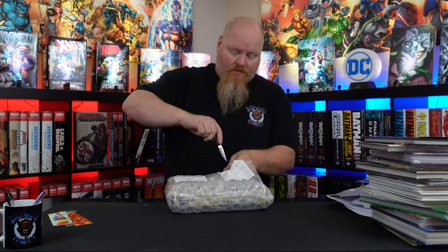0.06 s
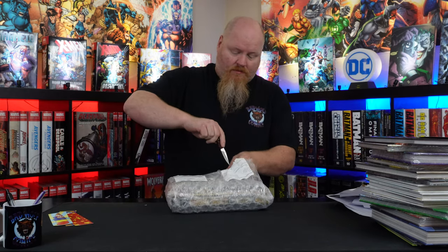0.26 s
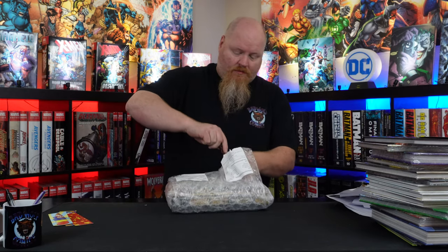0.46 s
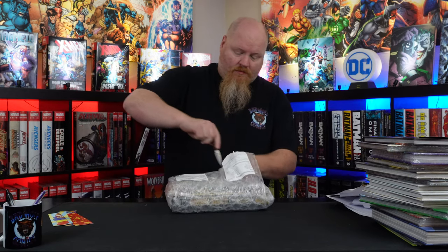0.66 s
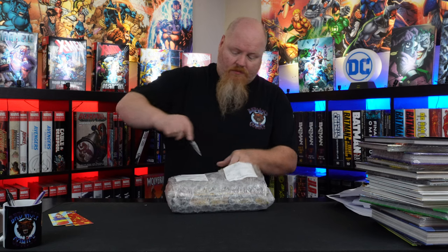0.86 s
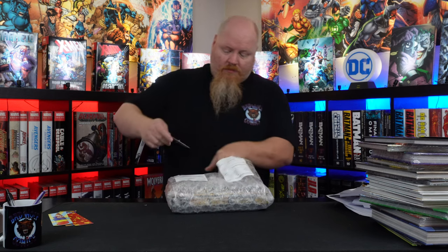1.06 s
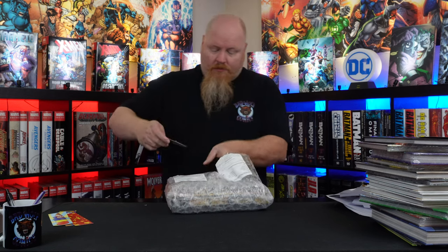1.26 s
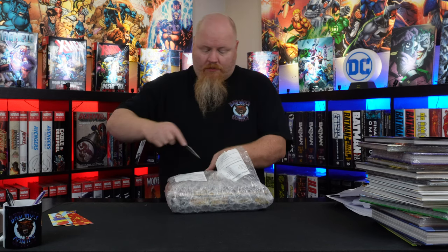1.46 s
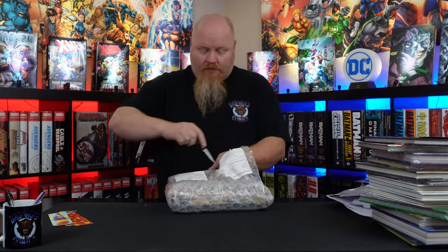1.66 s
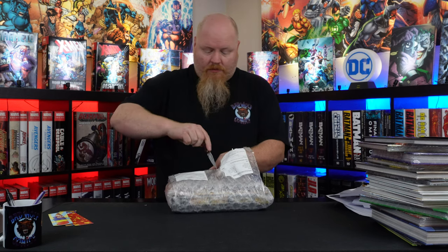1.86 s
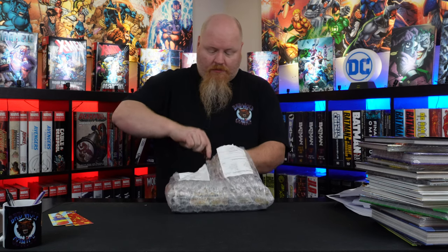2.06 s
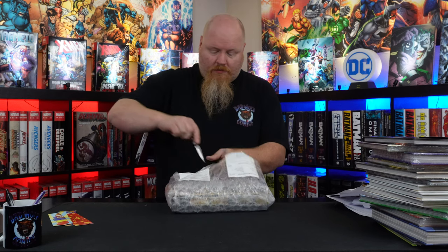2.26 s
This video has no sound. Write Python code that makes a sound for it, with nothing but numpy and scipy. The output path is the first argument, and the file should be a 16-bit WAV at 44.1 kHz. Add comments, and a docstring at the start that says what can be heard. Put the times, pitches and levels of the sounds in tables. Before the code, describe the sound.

Plastic bubble wrap being cut open, rustling and crackling, as two bubbles burst.

```python
"""A knife rips a plastic bubble mailer open in a run of sharp snaps, on a desk in a small furnished room.
Each break is an impulse that rings the taut film, the air pocket behind it and the cut edge; stick-slip
of the blade makes short zips. Under the hand the film rustles, ticks and sizzles, and the bag bumps.
Two bubbles burst: the sudden release of air gives loud pops that ring in the bag and the room."""
import sys
import numpy as np
from scipy import signal
from scipy.fft import rfft, irfft
from scipy.io import wavfile
from scipy.ndimage import uniform_filter1d, minimum_filter1d

SR = 44100
rng = np.random.default_rng(int(sys.argv[2]) if len(sys.argv) > 2 else 0)


def transcribe(u):
    """Save the signal u as a 16-bit wav file named by the first command-line argument.

    u: samples, shape (n,) or (channels, n), limited to [-1, 1]; the rate is SR.
    q: integer samples, one column per channel.
    """
    v = np.clip(np.atleast_2d(u).T, -1, 1)
    q = np.round(v * 32767).astype(np.int16)
    wavfile.write(sys.argv[1], SR, q)


N = 101429
HZ = np.fft.rfftfreq(4096, 1 / SR) + 1


def amp(db):
    """Amplitude ratio of a level in decibels."""
    return 10 ** (np.asarray(db) / 20)


def curve(points, hz=HZ):
    """Interpolation of a table on a logarithmic frequency axis."""
    f, value = np.transpose(points)
    return np.interp(np.log(hz + 1), np.log(f), value)


def unit(x):
    """Normalisation to unit energy."""
    return x / np.sqrt(np.sum(x ** 2) + 1e-20)


def add(mix, s, sound):
    """Superposition: a sound joins the mix at s seconds."""
    part = mix[max(round(s * SR), 0):][:len(sound)]
    part += sound[:len(part)]


def minimum_phase(gain):
    """Minimum phase gives the most compact causal pulse with a given magnitude spectrum."""
    log_gain = np.log(np.maximum(np.r_[gain, gain[-2:0:-1]], 1e-5 * gain.max()))
    return np.fft.ifft(np.exp(np.conj(signal.hilbert(log_gain)))).real


def click(spectrum):
    """Impulse response of a tabulated spectrum, at unit energy."""
    return unit(minimum_phase(amp(curve(spectrum))))


def noise_burst(spectrum, decay_s):
    """Damped random vibration: filtered noise under an exponential decay, at unit energy."""
    t = np.arange(SR // 8) / SR
    return unit(signal.fftconvolve(rng.standard_normal(len(t)) * np.exp(-t / decay_s), click(spectrum)))


# envelope of the film sliding under the hand: t/s, level/dB
RUSTLE_ENVELOPE = [(0, -43), (.13, -45.5), (.19, -56), (.24, -42), (.31, -46), (.37, -54.5), (.52, -48.5),
                   (.58, -59.5), (.63, -58), (.72, -50), (.83, -52), (.86, -44), (.915, -46.5),
                   (0.982, -42), (0.994, -60), (1.05, -50), (1.11, -46), (1.15, -41.5), (1.2, -45.5),
                   (1.28, -43.5), (1.42, -37.5), (1.52, -42), (1.6, -49), (1.721, -56), (1.871, -60),
                   (1.99, -50), (2.1, -55), (2.18, -68), (2.24, -56), (2.27, -47), (2.3, -52)]
# spectrum of the sliding film: f/Hz, level/dB
RUSTLE_SPECTRUM = [(60, -33), (200, -10), (500, -4), (1050, 0.5), (1600, -3), (2600, -1.5), (3400, 2.5),
                   (4500, -2), (6500, -9.5), (9000, -17.5), (15000, -29)]
def rustle(grains_per_s=800, colours=12, spread_db=5, tilt_db_per_octave=0.55, hiss_share=0.62):
    """Friction noise: a Poisson stream of tiny, brighter crinkles over the hiss of sliding film."""
    grains = np.zeros(N)
    for _ in range(colours):
        size = amp(spread_db * np.minimum(rng.exponential(1, N), 3.3)) * rng.choice([-1, 1], N)
        train = size * (rng.random(N) < grains_per_s / colours / SR)
        spectrum = [(hz, db + tilt_db_per_octave * np.log2(hz / CREASE_HZ) + 4 * rng.standard_normal())
                    for hz, db in RUSTLE_SPECTRUM]
        grains += signal.oaconvolve(train, click(spectrum))[:N]
    hiss = signal.oaconvolve(rng.standard_normal(N), click(RUSTLE_SPECTRUM))[:N]
    envelope = amp(np.interp(np.arange(N) / SR, *np.transpose(RUSTLE_ENVELOPE)))
    return unit(unit(grains) + hiss_share * unit(hiss)) * np.sqrt(N) * envelope


# spectrum of still room air: f/Hz, level/dB
ROOM_AIR_SPECTRUM = [(20, -2.5), (60, 6), (110, -3.5), (300, -0.5), (4000, -8), (15000, -21.5)]
def room_air(level_db=-64):
    """Stationary noise: the faint, steady air of the room."""
    return amp(level_db) * signal.oaconvolve(rng.standard_normal(N), click(ROOM_AIR_SPECTRUM))[:N]


RING_Q, POCKET_HZ, POCKET_Q, EDGE_HZ, EDGE_Q = 2.13, 931, 1.45, 6520, 3
TEAR_S, TEAR_SHARE = 0.0016, 0.56  # the ragged part of a break
DESK_S, DESK_SHARE = 0.00057, 0.49  # reflection from the desk top
def snap(ring_db, ring_hz, pocket_db, edge_db, skirt=1.63, pocket_delay_s=0.000694):
    """Impulse excitation: a ragged break drives the resonances of film, air pocket and cut edge."""
    resonances = (ring_db, ring_hz, RING_Q), (pocket_db, POCKET_HZ, POCKET_Q), (edge_db, EDGE_HZ, EDGE_Q)
    power = 0
    for db, hz, q in resonances:
        shape = (1 + (q * (HZ / hz - hz / HZ)) ** 2) ** -skirt
        power = power + amp(db) ** 2 * shape / shape.mean()
    power = power / (1 + (267.3 / HZ) ** 4) / (1 + (HZ / 15000) ** 8)  # band that a small patch radiates
    # dispersion: low frequencies leave the film later
    lag = np.exp(-4j * np.pi * pocket_delay_s * POCKET_HZ * np.arctan(HZ / POCKET_HZ))
    response = irfft(rfft(minimum_phase(np.sqrt(power))) * lag)[:SR // 40]
    t = np.arange(SR // 200) / SR
    excitation = TEAR_SHARE * unit(rng.standard_normal(len(t)) * np.exp(-t / TEAR_S))
    excitation[0] += 1
    add(excitation, DESK_S * rng.uniform(0.85, 1.15), np.array([DESK_SHARE]))
    return np.convolve(response, unit(excitation))


# spectrum of fine fibres parting: f/Hz, level/dB
FIZZ_SPECTRUM = [(3000, -54), (6000, 12), (9500, -2), (15000, -16.5)]
def fizz(db, decay_s):
    """Small-scale fracture: fine fibres part in a spit of high-frequency noise."""
    return amp(db) * noise_burst(FIZZ_SPECTRUM, decay_s)


# small creases flipping: t/s, level/dB
CREASE_FLIPS = [(0.038, -17), (0.0512, -15), (0.201, -17), (0.5367, -24), (0.5484, -22), (0.582, -25.5),
                (0.604, -28), (0.738, -24), (.8136, -25), (0.85, -12), (0.8822, -22), (0.9376, -17),
                (1.0312, -23.5), (1.058, -18.5), (1.0814, -10.5), (1.098, -20), (1.1333, -16),
                (1.1678, -17), (1.2165, -16.5), (1.239, -20), (1.418, -7), (1.469, -10), (1.514, -23),
                (1.6238, -20), (1.6636, -17.5), (1.8936, -25.5), (1.9655, -20), (2.1224, -23),
                (2.2505, -22)]
CREASE_HZ, EDGE_RE_RING_DB = 3495, -17
def creases():
    """Buckling: each crease flips with a tick of slightly different pitch."""
    out = np.zeros(N)
    for (s, db), detune in zip(CREASE_FLIPS, rng.standard_normal(len(CREASE_FLIPS))):
        ring_hz = CREASE_HZ * np.exp(0.1 * detune)
        add(out, s, snap(db, ring_hz, pocket_db=db - 9, edge_db=db + EDGE_RE_RING_DB))
        add(out, s, fizz(db - 16.5, TEAR_S))
    return out


# the padded bag shifting on the desk: t/s, level/dB, decay time/s
BAG_BUMPS = [(0.131, -13.5, 0.0044), (.53, -18, 0.032), (0.94, -22, 0.018), (0.974, -17.5, 0.0052),
             (1.6604, -22, 0.0046), (1.9635, -17.5, 0.0036), (2.1943, -20.5, 0.0048)]
# spectrum of a bump: f/Hz, level/dB
BUMP_SPECTRUM = [(60, -31), (130, -12.5), (250, -4.5), (500, 1.5), (900, -1.5), (2000, -16.5), (8000, -33)]
def bumps():
    """Damped impact: the padded bag gives soft, hollow knocks."""
    out = np.zeros(N)
    for s, db, decay_s in BAG_BUMPS:
        add(out, s, amp(db) * noise_burst(BUMP_SPECTRUM, decay_s))
    return out


# film giving way at the blade: t/s, ring level/dB, ring f/Hz, air-pocket level/dB, edge level/dB
FILM_BREAKS = [(0.2189, -6.5, 2110, -32, -27), (0.2197, 2, 3500, -15.5, -39),
               (0.3355, -7, 2980, -13.5, -27), (.3946, 8, 3250, -28, -3), (0.5664, -16, 2370, -17.5, -47),
               (1.3097, 1.5, 3830, -13, -28), (1.3343, 4, 4060, -4.5, -19), (1.3556, 1.5, 4100, -9, -6),
               (1.3762, 5.5, 3750, -0.5, -5), (1.4, 3.5, 3470, 0.5, -16), (1.434, 9.5, 3700, 8.5, -3),
               (1.443, 6, 3250, 0, -9), (1.458, 5.5, 3750, -2.5, -22), (1.5367, -5, 3740, -0.5, -7),
               (1.5495, 3, 3050, 4, -1.5), (1.5508, -8.5, 1730, -33, -15), (2.0071, 12.5, 3180, 0.5, -13),
               (2.1943, -11, 3100, -16, -25)]
def rips():
    """Fracture: the taut film gives way at the blade in hard snaps, each with a trace of fizz."""
    out = np.zeros(N)
    for s, ring_db, ring_hz, pocket_db, edge_db in FILM_BREAKS:
        add(out, s, snap(ring_db, ring_hz, pocket_db, edge_db))
        add(out, s + DESK_S, fizz(ring_db - 39, decay_s=0.0033))
    return out


# blade strokes: t/s, duration/s, first slip rate/Hz, last slip rate/Hz, level/dB, fade/dB, ring f/Hz
BLADE_STROKES = [(0.222, 0.043, 290, 400, -15.5, -2.5, 3680), (.27, 0.031, 430, 450, -12, -5, 3700),
                 (1.773, .036, 280, 310, -16.5, -12, 4054)]
def zips(jitter=0.13, scatter_db=2.5, lowpass_hz=7400):
    """Stick-slip friction: the sliding blade excites the film in a nearly periodic run of soft snaps."""
    out = np.zeros(N)
    for start, length, first_rate, last_rate, level_db, fade_db, hz in BLADE_STROKES:
        s = 0
        for gap, softness, detune in rng.standard_normal((24, 3)):
            if s < length:
                db = level_db + fade_db * s / length - scatter_db * softness
                ring_hz = hz * np.exp(0.06 * detune)
                add(out, start + s, snap(db, ring_hz, pocket_db=db - 30, edge_db=db + EDGE_RE_RING_DB))
                rate = first_rate + (last_rate - first_rate) * s / length
                s += np.exp(jitter * gap) / rate
    return signal.sosfilt(signal.butter(2, lowpass_hz, fs=SR, output="sos"), out)


# bursting bubbles: t/s, crack level/dB, air level/dB, air delay/s, echo delay/s, echo ratio,
# flap level/dB, flap decay time/s, bag ring level/dB, room send/dB
BURSTS = [(0.3873, 11, 13, 0.001308, 0.004016, 0.45, 12.5, 0.017, 1.5, -9),
          (2.007, -1, 9, 0.00153, .012, 0.63, 8, 0.021, 2.5, -2.5)]
# spectrum of the skin cracking: f/Hz, level/dB
CRACK_SPECTRUM = [(100, -29), (700, -8), (1500, -1), (2400, 3.5), (4800, 1.5), (7000, -3), (9000, -18.5),
                  (15000, -33)]
# spectrum of the escaping air pulse: f/Hz, level/dB
PULSE_SPECTRUM = [(70, -44.5), (110, -15.5), (190, -1.5), (290, 0), (360, -1), (760, 5.5), (1100, 5.5),
                  (1800, -15), (15000, -39)]
# spectrum of the torn skin flapping: f/Hz, level/dB
FLAP_SPECTRUM = [(80, -30), (190, -24), (360, -14), (750, -3), (1100, -1), (2400, -5.5), (3250, -1.5),
                 (5000, -7), (7000, -14.5), (9000, -18.5), (15000, -30)]
# hollow modes of the bag: f/Hz, level/dB
BAG_RESONANCES = [(194, -9.5), (289, -8), (466, -3.5), (687, -11.5), (754, 0), (1087, -6), (1222, -11),
                  (3230, -5)]
BAG_BUILD_S, BAG_T60_S = 0.0081, 0.15
def pop(s, crack_db, air_db, delay_s, echo_s, echo_ratio, flap_db, flap_s, bag_db, room_db):
    """Pressure release: the skin cracks and flaps, the air thump sounds and repeats, the bag rings."""
    out = np.zeros(N)
    crack = amp(crack_db) * click(CRACK_SPECTRUM)
    add(out, s, crack)
    add(out, s + DESK_S, DESK_SHARE * crack)
    pulse = -amp(air_db) * click(PULSE_SPECTRUM)
    add(out, s + delay_s, pulse)
    add(out, s + delay_s + echo_s, echo_ratio * pulse)
    add(out, s, amp(flap_db) * noise_burst(FLAP_SPECTRUM, flap_s))
    out = in_room(out, room_db)
    t = np.arange(SR // 2) / SR
    envelope = (1 - np.exp(-(t / BAG_BUILD_S) ** 2)) * amp(-60 * t / BAG_T60_S)
    for hz, db in BAG_RESONANCES:
        mode = envelope * np.sin(2 * np.pi * (hz * t + rng.random()))
        add(out, s + delay_s, amp(bag_db + db) * unit(mode))
    return out


# film dragging across itself: t/s, level/dB, decay time/s
FILM_DRAGS = [(.948, -31, 0.018), (1.133, -22.5, 0.026)]
# spectrum of a drag: f/Hz, level/dB
SIZZLE_SPECTRUM = [(2000, -26), (9000, -1), (15000, -5)]
def sizzles():
    """Sliding friction: film on film gives a brief, very high sizzle."""
    out = np.zeros(N)
    for s, db, decay_s in FILM_DRAGS:
        add(out, s, amp(db) * noise_burst(SIZZLE_SPECTRUM, decay_s))
    return out


# reverberation time of the room: f/Hz, T60/s
REVERB_TIMES = [(150, 0.27), (1000, 0.2), (3500, 0.24), (7000, 0.19), (14000, 0.22)]
# spectrum of the diffuse field: f/Hz, level/dB
REVERB_SPECTRUM = [(110, -15.5), (190, 6.5), (240, -10), (290, 9.5), (350, 0), (480, 1.5), (1000, 0),
                   (2300, 1.5), (3400, -4), (6000, -5), (14000, 0)]
def room_tail(build_s):
    """Reverberation: the diffuse field builds quickly, then decays exponentially in each band."""
    t = np.arange(SR // 2) / SR
    hz, frame_s, bands = signal.stft(rng.choice([-1., 1.], len(t)), SR, nperseg=256)
    decay = amp(-60 * frame_s / curve(REVERB_TIMES, hz)[:, None])
    tail = signal.istft(bands * decay, SR, nperseg=256)[1][:len(t)]
    build = 1 - np.exp(-(t / build_s) ** 2)
    return unit(signal.fftconvolve(tail * build, click(REVERB_SPECTRUM)))


# early reflections from the walls: delay/s, amplitude ratio
WALL_ECHOES = [(.0068, 0.3), (0.013, 0.084)]
def in_room(x, room_db, build_s=0.0034, crossfade_hz=19):
    """Room response: direct sound, early reflections and two alternating tails, so hits ring unalike."""
    phase = 2 * np.pi * crossfade_hz * np.arange(N) / SR
    wet = sum(0.75 * signal.fftconvolve(x * weight, room_tail(build_s))[:N]
              for weight in (np.sin(phase), np.cos(phase)))
    dulled = np.convolve(x, np.hanning(5) / 2)
    for s, share in WALL_ECHOES:
        add(wet, s, share * dulled)
    return x + amp(room_db) * wet


def scene():
    """Superposition of handling, cutting, pops and room air in one channel."""
    handling = in_room(rustle() + sizzles() + bumps(), room_db=-3)
    cutting = in_room(rips() + zips() + creases(), room_db=-6.5, build_s=0.0048)
    pops = sum(pop(*burst) for burst in BURSTS)
    return (handling + cutting + pops + room_air())[None]


def record(dry, ceiling=0.91, limiter_s=0.0021, lowpass_hz=15900):
    """Peak limiting: a fast, smoothed gain holds down the loudest peaks; a low-pass filter follows."""
    width = round(limiter_s * SR)
    gain = minimum_filter1d(ceiling / np.maximum(abs(dry), ceiling), width)
    limited = dry * uniform_filter1d(gain, width)
    lowpass = signal.firwin(255, lowpass_hz, window=("kaiser", 9), fs=SR)
    return signal.oaconvolve(limited, lowpass[None], "same")


dry = scene()
out = record(dry)
transcribe(out)
```